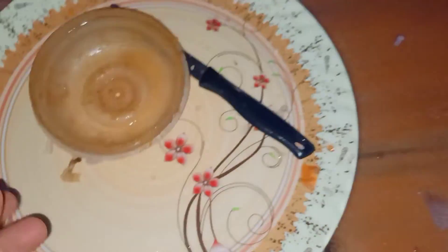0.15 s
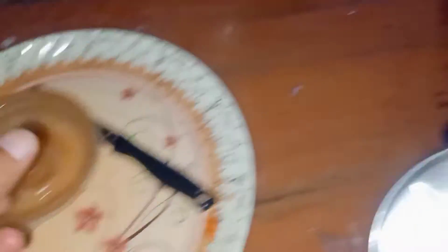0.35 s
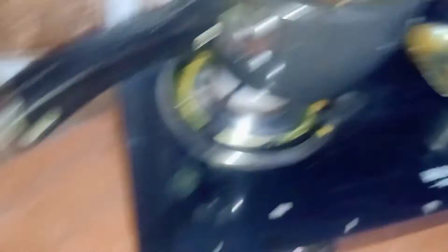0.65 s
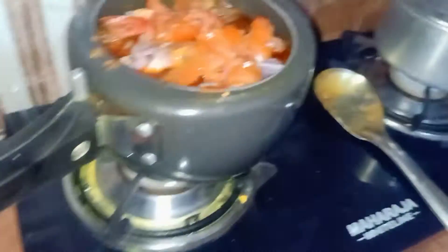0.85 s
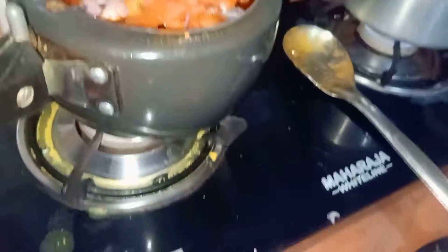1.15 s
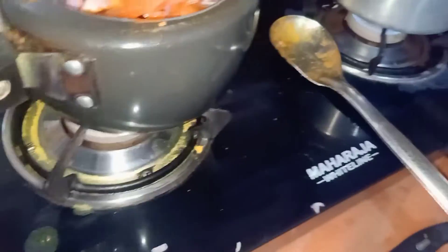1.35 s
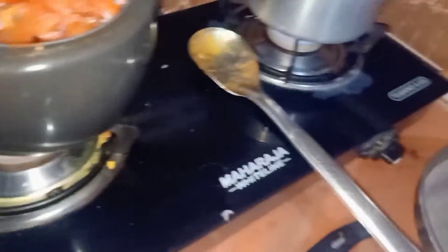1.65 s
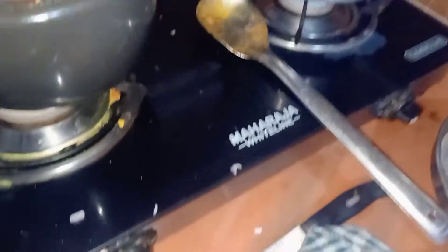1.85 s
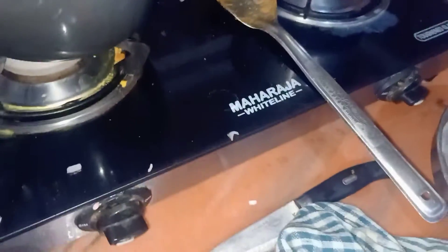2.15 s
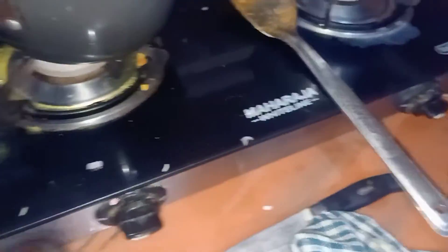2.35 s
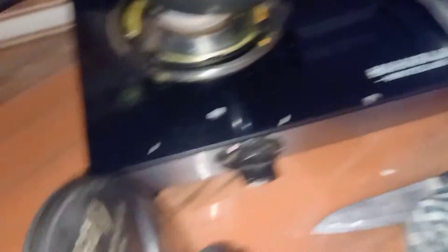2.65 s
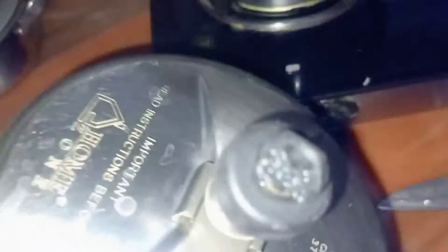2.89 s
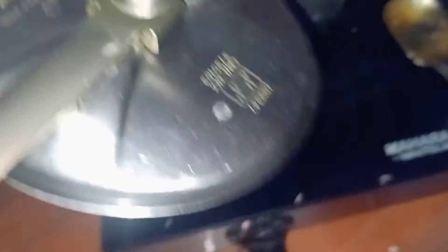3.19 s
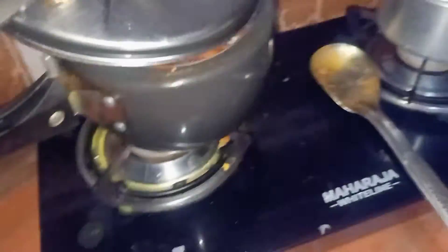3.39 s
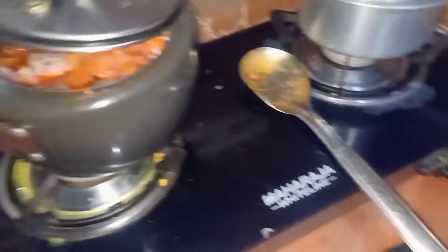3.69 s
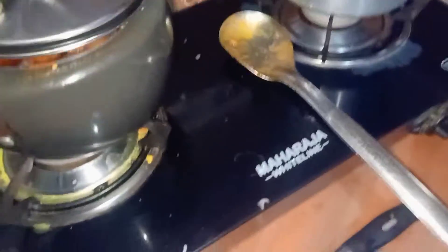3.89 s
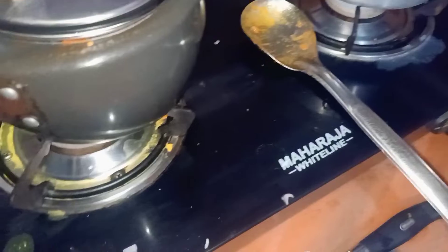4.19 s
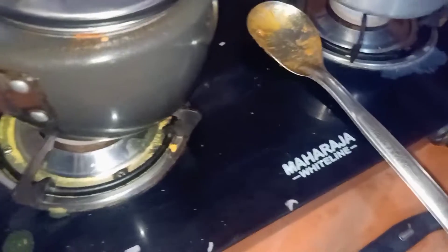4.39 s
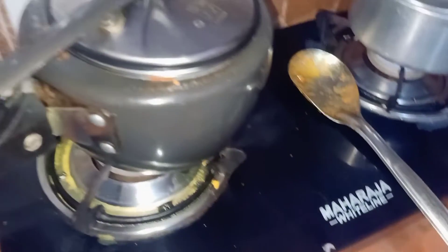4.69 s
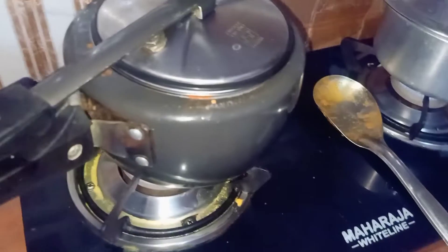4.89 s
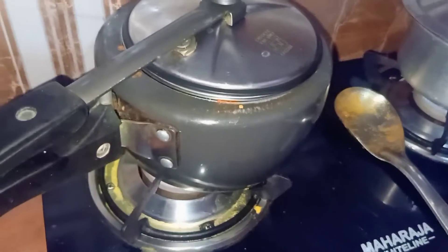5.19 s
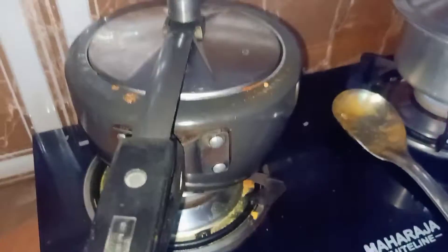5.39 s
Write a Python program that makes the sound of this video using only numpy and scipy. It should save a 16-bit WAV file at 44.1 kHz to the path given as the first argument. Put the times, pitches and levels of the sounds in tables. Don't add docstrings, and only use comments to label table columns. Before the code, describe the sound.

Short damped clanks of kitchen metal, heard near on an uneven stereo phone, brighter on the left and muffled on the right. First a thin tray rattle, later a lid's abrupt scrape and loose rattling, then one loud lid drop onto a pot and a smaller settling knock. Afterwards only light touches, cloth swishes, room rumble and a very faint far horn.

```python
import sys
import numpy as np
from scipy import signal
from scipy.fft import rfft, irfft
from scipy.io import wavfile
from scipy.ndimage import uniform_filter1d

SR = 44100
rng = np.random.default_rng(int(sys.argv[2]) if len(sys.argv) > 2 else 0)


def inscribe(sig):
    pcm = np.round(np.clip(np.atleast_2d(sig).T, -1, 1) * 32767)
    wavfile.write(sys.argv[1], SR, pcm.astype(np.int16))


def gain_from_db(level_db):
    decades = np.asarray(level_db, float) / 20
    return 10 ** decades


N = 244314
T = np.arange(N) / SR

# (frequency [Hz], level [dB], t60 [s])
LID_MODES = [(346, -3, 0.11), (500, -8, .1), (620, -8, .09), (775, -4, .08), (1012, -5, .05),
             (1710, -9, .1), (1752, -6, .14), (1970, -10, .07), (2090, -6, .1), (2230, -8, .08),
             (2321, 2, .22), (2376, -5, .16), (2472, -5, 0.14), (3112, -14, 0.07), (3450, -16, .1),
             (3594, -4.5, .17), (3870, -18, .06), (4260, -18, .07), (4540, -12, .08), (4782, -7.5, .1),
             (5168, -2, .12), (5232, -1.5, 0.17), (5438, -9, .08), (5556, 0, .17), (5716, -6, .12),
             (5902, -14, .08), (7240, -22, .04), (7462, -23, .04), (200, -6, .06), (400, -3, .13),
             (900, -8, .06)]
# (frequency [Hz], level [dB], t60 [s])
POT_MODES = [(341, 1.5, .13), (420.2, -2, 0.14), (520, -8, .13), (653, -5, .14), (718, 2.5, .22),
             (797, -4, 0.16), (885, -7, .12), (1124, -12, 0.17), (1213, -10.5, .16), (1300, -16, .12),
             (1450, -16, .1), (1664, -2, .09), (1750, 1, .13), (1870, -10, .1), (2000, -4.5, .13),
             (2100, -1, 0.15), (2155, -1, .3), (2226, -3, .16), (2330, -3, 0.09), (2380, -6, .11),
             (2488, -9, .09), (2978, -12, .07), (3240, -14, .07), (3600, -17, .1), (3700, -15, .3),
             (3791, -17, 0.098), (4176, -14, .11), (4570, -14, .08), (4914, -10, .1), (5220, -1, 0.18),
             (5300, -4, .2), (5538, -3, .11), (5630, -6, .08), (5748, -5, .08), (6018, -9, .09),
             (6244, -13, .09), (245, -5, .07), (570, -8, .1), (950, -7, .11), (2285, -3, .12)]
# (frequency [Hz], level [dB per Hz])
CONTACT_COLOUR = [(90, -55), (170, -22.5), (340, -26.5), (720, -14), (1500, -14), (1750, -6), (2310, 6.5),
                  (2900, -5), (4300, -20.5), (5400, -12), (6600, -22.5), (8500, -35), (12000, -38.5),
                  (15300, -35.5), (15900, -71.5)]
# (lower edge [Hz], upper edge [Hz])
BANDS_HZ = [(170, 1200), (1200, 3500), (3500, 8000), (8000, 19000)]
FREE_SPOT_DB = 6


def colour(x, points):
    hz, db = np.transpose(points)
    grid = np.maximum(np.fft.rfftfreq(4096, 1 / SR), 1)
    log_gain = np.interp(np.log(grid), np.log(hz), db) * np.log(10) / 20
    cepstrum = irfft(log_gain)
    cepstrum[1:2048] *= 2
    cepstrum[2049:] = 0
    impulse = irfft(np.exp(rfft(cepstrum)))
    return signal.oaconvolve(x, impulse[None], axes=-1)[:, :x.shape[1]]


def band(x, edges):
    return signal.sosfilt(signal.butter(2, edges, "band", fs=SR, output="sos"), x)


def band_of(hz):
    return np.searchsorted([edge for edge, _ in BANDS_HZ[1:]], hz)


def unit_rms(x):
    return x / np.sqrt(np.mean(x ** 2))


def walk(rate):
    hold = int(SR / rate)
    steps = np.repeat(rng.standard_normal(N // hold + 1), hold)
    return uniform_filter1d(steps, hold)[:N]


def pair(alike, size=N):
    mid, side = rng.standard_normal((2, size))
    alike = np.clip(alike, 0, 1)
    return np.sqrt((1 + alike) / 2) * mid + np.sqrt((1 - alike) / 2) * side * np.array([[1], [-1]])


def fade(x, ms):
    return signal.lfilter([1], [1, -np.exp(-1000 / (ms * SR))], x)


def ring(push, hz, t60, blur_hz):
    pole = np.exp(-np.log(1000) / (t60 * SR))
    jitter = np.cumsum(rng.standard_normal(len(push))) * np.sqrt(2 * np.pi * blur_hz / SR)
    phase = jitter + 2 * np.pi * hz * T[:len(push)]
    port_turn = np.array([[0], [min(hz / 1500, 1) * np.pi * rng.uniform(-1, 1)]])
    return signal.lfilter([1], [1, -pole], push) * np.sin(phase + port_turn)


def struck(hits, modes, tint, ring_db, crack_db, crack_ms, buzz_db, buzz_ms, top_db, top_slope, held_db=0,
           ping_db=-9, flare=1.5, spot_db=3, grip=1, rub=np.zeros(N), rub_db=(0, 0, 0, 0)):
    s, peak, low, high, spot_hz = np.transpose(hits)
    soft_db = 0.21 * np.minimum(peak + 38, 0)
    freedom = np.clip(0.5 + 0.02 * (low + 29.5), .2, 1)

    start = int(max(np.round(s[0], 1) - .1, 0) * SR)
    stop = int((np.round(s[-1], 1) + .4) * SR)
    size = stop - start
    at = np.round(s * SR).astype(int) - start
    rub = rub[start:stop]

    splash = top_db + top_slope * high + soft_db + 0.7 * (low + 15)
    bands_db = peak + np.array([low + 10.77, np.zeros(len(s)), high + 0.12, splash])
    out = np.zeros((2, N))

    for b, edges in enumerate(BANDS_HZ):
        blows = np.bincount(at, gain_from_db(bands_db[b]), size)
        ticks = np.bincount(at, gain_from_db(bands_db[b] + soft_db), size)
        crack = gain_from_db(crack_db) * fade(ticks, crack_ms)
        buzz = gain_from_db(buzz_db) * fade(blows, buzz_ms)
        burst = crack + buzz + abs(rub) * gain_from_db(rub_db[b])
        noise = pair(np.clip(400 / edges[0], .4, .9), size)
        paint = lambda x: band(band(colour(x, tint), edges), edges)
        contact = paint(burst * noise + gain_from_db(crack_db + 8) * ticks)
        out[:, start:stop] += contact / paint(noise[:, :SR // 4]).std()

    age = T[:SR // 20]
    spot_band = band_of(spot_hz)
    for i in range(len(s)):
        ping_level = gain_from_db(bands_db[spot_band[i], i] + ping_db - 60 * age / .045)
        ping = ping_level * np.sin(2 * np.pi * spot_hz[i] * age)
        begin = start + at[i]
        out[:, begin:begin + len(age)] += ping * np.minimum(age * spot_hz[i] / 2, 1)

    hz, db, t60 = np.transpose(modes)
    db = db + held_db
    mode_band = band_of(hz)
    late = (rng.random((len(s), len(hz))) * (.0015 + 1.5 / hz) * SR).astype(int)
    nearness = np.exp(-(np.log2(hz / spot_hz[:, None]) / .03) ** 2)
    chance = 2.2 * rng.standard_normal((len(s), len(hz))) + (spot_db - db) * nearness - 2
    touching = 1 + flare * np.minimum(fade(np.bincount(at, np.ones(len(s)), size), 4.72), 1)
    for k in range(len(hz)):
        strength = freedom * gain_from_db(ring_db + bands_db[mode_band[k]] + chance[:, k])
        push = np.bincount(at + late[:, k], strength, size) + rub
        tone = ring(push, hz[k], t60[k] / grip, blur_hz=5 + hz[k] / 600 + 3000 / hz[k])
        out[:, start:stop] += gain_from_db(db[k]) * band(touching * tone, (hz[k] / 2.18, hz[k] * 1.89))
    return out


def pot_drop():
    # (time [s], peak [dB], low band over peak [dB], high band over peak [dB], favoured mode [Hz])
    pot_hits = [
        (3.7262, -15, -19, -2, 2290),
        (3.7289, -13.5, -16.5, -1, 5590),
        (3.7395, -19, -22, -0.5, 1650),
        (3.7418, -14.5, -24, -12, 2350),
        (3.7488, -24.5, -11, 6, 5780),
        (3.7565, -28, -16.5, -4, 2980),
        (3.7624, -34, 0, -12, 718),
    ]
    pot_open_db = [1, -5.5, -5.5, -3.5, 0, 0.5, -1.5, 8.5, 6, -0.5, -3, -4.5, 6.5, 2.5, -7.5, 4.5, -1, 6.5,
                   1, 1.5, 3, 0.5, 0, -1, -4, -1, 3.5, 0.5, -5, -6.5, -5, -4, -1, 1, 4.5, 6.5, 1, -9.5, 6,
                   -6.5]
    return struck(pot_hits, POT_MODES, CONTACT_COLOUR, flare=3.25, ring_db=-20, crack_db=-6.5, crack_ms=4.1,
                  buzz_db=-19, buzz_ms=14, top_db=-13, top_slope=0.8, held_db=pot_open_db, grip=1.63)


def lid_settle():
    # (time [s], peak [dB], low band over peak [dB], high band over peak [dB], favoured mode [Hz])
    settle_hits = [
        (3.8975, -18, -21.5, -11, 1750),
        (3.9045, -34.5, -7, -3, 5570),
        (3.9115, -28, -21.5, -3, 1750),
        (3.918, -41.5, 0, -14, 530),
        (3.9345, -41.5, -14, -2, 2320),
        (3.945, -40.5, -7, -4, 418),
        (3.972, -47, -3, -6, 400),
    ]
    pot_lidded_db = [-1.5, 3, 3, -12, -10, -8, -5, 4, -16, -22, 4, -7, -1.5, 5, 3, -10, -5, -8, -3, -5, 1.5,
                     -8, 6.5, 8, 7, 1, 0, -5, 7, -13.5, -3, 0, -2, -6.5, -2, 0.5, -3, -1.5, -5, 1.5]
    return struck(settle_hits, POT_MODES, CONTACT_COLOUR, flare=2.7, ring_db=-13, crack_db=-7, crack_ms=3.3,
                  buzz_db=-17, buzz_ms=11, top_db=-17.5, top_slope=0.68, held_db=pot_lidded_db, grip=1.43)


def drag():
    # (time [s], level [dB])
    drag_drive = [
        (2.3, -61.5),
        (2.43, -38),
        (2.476, -25),
        (2.504, -33.5),
        (2.592, -66),
        (2.64, -39),
    ]
    s, db = np.transpose(drag_drive)
    sizes = gain_from_db(2.5 * rng.exponential(size=N)) * rng.choice([-1, 1], N)
    slips = (rng.random(N) < 1500 / SR) * sizes
    surge_db = 3 * walk(120)
    return slips * gain_from_db(np.interp(T, s, db, left=-120, right=-120) - 23 + surge_db)


def lid_slips():
    # (time [s], peak [dB], low band over peak [dB], high band over peak [dB], favoured mode [Hz])
    rim_slips = [(2.3585, -28, -26, -2.5, 4782), (2.3953, -36, -17.5, -10, 2380),
                 (2.4207, -28, -16, -18.5, 1970), (2.4428, -19.5, -14.5, -9, 2472),
                 (2.4478, -28, -14, 2, 5570), (2.4535, -27, -19, 2, 3600), (2.4638, -21, -29, -1, 2310),
                 (2.4668, -22, -20.5, 1.7, 5120), (2.4775, -13, -22.5, -3, 2267),
                 (2.4825, -21.5, -22, -3.5, 5200), (2.4925, -17, -27, 4, 5660),
                 (2.4975, -20, -6.5, -6, 2230), (2.5028, -16.5, -24.5, 1, 5430),
                 (2.5172, -15, -17.5, 0, 5160), (2.531, -23.5, -23, -4.5, 2472),
                 (2.5809, -34.5, -31, 1.5, 5556)]
    lid_on_stone_db = [-17, -8.5, -3.5, 1, 2.5, 0, -2, 7.5, -1.5, -1, 4, -3, 0, 2.5, -3.5, -1.5, -0.5, 8,
                       -9, -12, -4, -4.5, -3.5, -2, -1, -7, 5.5, 6.5, -14, -12.5, 0.5]
    return struck(rim_slips, LID_MODES, CONTACT_COLOUR, flare=2.4, ping_db=-6.5, ring_db=-18, spot_db=6.5,
                  crack_db=-16.5, crack_ms=3.1, buzz_db=-29, buzz_ms=11, top_db=-12, top_slope=0.33,
                  held_db=lid_on_stone_db, grip=1.4, rub=drag(), rub_db=(0.5, -9.5, -8.5, -22.5))


def lid_rattle():
    # (time [s], peak [dB], low band over peak [dB], high band over peak [dB], favoured mode [Hz])
    lid_hits = [(2.1655, -45, -24, -13.5, 2330), (2.176, -47, -23.5, -8.5, 2330),
                (2.1915, -39.5, -16.5, -0.5, 5232), (2.266, -42, -19.5, -16.5, 2600),
                (2.2785, -26, -39, -16.5, 2472), (2.2835, -36, -33, -0.5, 4782),
                (2.2845, -40.5, -36, -3, 5716), (2.333, -39, -30, -9.5, 2472),
                (2.608, -34, -13.5, -4.5, 2800), (2.6312, -30, -20, -7.5, 2460),
                (2.6508, -17, -26.5, -9.5, 1764), (2.6528, -17.5, -35, -4.5, 5220),
                (2.6605, -36.5, -13.5, 5.5, 5320), (2.6644, -31.5, 0, 8.5, 703),
                (2.675, -35, -9, 1.5, 4780), (2.688, -34, -4, -9.5, 400), (2.705, -48, -2, -13, 383),
                (2.722, -49, 3, -15, 620), (2.9439, -39, -27, -7.5, 5270), (2.9505, -44, -16, -20, 2321),
                (2.992, -31.5, -18, -20.5, 2230), (3.0001, -38.5, -21, -7, 1970),
                (3.052, -33.5, -24.5, 4.5, 2090), (3.0542, -31.5, -20.5, -2, 6940),
                (3.0742, -45, -9, 12.5, 4940), (3.0786, -29, -30.5, -3, 3112), (3.0858, -46, -24, -3, 2321),
                (3.0905, -47, -24, 9, 2472), (3.2051, -44, -31, -2, 5700), (3.2236, -43.5, -32, -21, 2290),
                (3.2543, -35.5, -41, -1.5, 2290), (3.2765, -38, -35.5, -7, 4670),
                (3.2984, -38.5, -28.5, -4.5, 5640), (3.3623, -43, -20.5, -3, 5480),
                (3.4595, -39.5, -12.5, -7, 5490), (3.5857, -47, -14, -0.5, 2600)]
    lid_in_hand_db = [-1, 3, -0.5, -4, 2, -1.5, 4.5, -2.5, 5, 1.5, -9.5, -1, 4.5, 2.5, -3.5, -7, -2.5, -4.5,
                      3, 5, -2, -5.5, -6.5, -1, 0, -3, 4, -1, 0, -1, -5.5]
    return struck(lid_hits, LID_MODES, CONTACT_COLOUR, flare=2.46, ping_db=-3.5, ring_db=-14, crack_db=-5.5,
                  crack_ms=2.9, buzz_db=-27, buzz_ms=34, top_db=-12, top_slope=1.0,
                  held_db=lid_in_hand_db, spot_db=FREE_SPOT_DB, grip=1.6)


def tray_rattle():
    # (time [s], peak [dB], low band over peak [dB], high band over peak [dB], favoured mode [Hz])
    tray_hits = [(0.0004, -34, -5.5, -15, 1616), (0.0332, -22, -34, -9.5, 1654),
                 (0.0538, -12.5, -30, -6, 1917), (0.0646, -42, 1, -28, 1570),
                 (0.0998, -25.5, -10.5, -19, 1053), (0.113, -41, -6, -13, 334),
                 (0.1276, -23, -27, -8.5, 1619), (0.1494, -22.5, -35, -12, 1917),
                 (0.1659, -27.5, -21, -15, 1500), (0.3451, -49.5, -4, -17, 1616),
                 (0.427, -38, -11.5, -25, 1475), (0.439, -38, -26, -23, 1920),
                 (0.4839, -46.5, -7.5, -18, 1920)]
    # (frequency [Hz], level [dB], t60 [s])
    tray_modes = [(332.6, -4.5, 0.11), (599, -11, 0.13), (1053, -4, 0.096), (1320, -15, 0.028),
                  (1504, -3, 0.027), (1619, -3, 0.11), (1917, 1, 0.037), (2724, -5, 0.023),
                  (2869, -3, 0.014), (4310, -6, 0.019), (4610, -4.5, 0.014), (5090, 10.5, 0.012),
                  (5550, -3, 0.022)]
    # (frequency [Hz], level [dB per Hz])
    tray_colour = [(88, -48), (150, -32), (314, 0), (618, -8), (751, -35), (1040, 4.5), (1600, -5),
                   (3760, -12), (5330, -6), (6730, -26), (15500, -79)]
    return struck(tray_hits, tray_modes, tray_colour, ring_db=-10, crack_db=-4.5, crack_ms=1.9, buzz_db=-32,
                  buzz_ms=54, top_db=-3.5, top_slope=0.64, ping_db=-6.5, flare=1.85, spot_db=FREE_SPOT_DB)


def pot_nudges():
    # (time [s], peak [dB], low band over peak [dB], high band over peak [dB], favoured mode [Hz])
    nudge_hits = [
        (4.124, -50.5, -22, -11, 2270),
        (4.2208, -53, -18, -9, 2290),
        (4.229, -56, -21, 1, 5440),
        (4.2433, -49.5, -5, -5.5, 2155),
        (4.2777, -44.5, -24, -10, 2000),
        (4.2885, -48.5, -0.5, -10, 885),
        (4.2956, -40.5, -13, -1.5, 1960),
        (4.313, -56, -6, -9, 1124),
        (4.6877, -50.5, -10.5, -5.5, 4920),
    ]
    return struck(nudge_hits, POT_MODES, CONTACT_COLOUR, flare=0.99, ring_db=-11.5, crack_db=-4.5, crack_ms=2.6,
                  buzz_db=-17.5, buzz_ms=16, top_db=-42, top_slope=.4, spot_db=FREE_SPOT_DB, grip=2.4)


def room(x):
    # (frequency [Hz], t60 [s])
    room_t60 = [(200, 0.45), (1000, 0.31), (3000, 0.33), (8000, 0.36), (16000, 0.067)]
    hz, t60 = np.transpose(room_t60)
    t = T[:SR // 2]
    build_up = 1 - np.exp(-t / 0.00093)
    tail = 0
    for mid in 90 * 2. ** np.arange(8):
        decay = gain_from_db(-60 * t / np.interp(np.log(mid), np.log(hz), t60))
        noise = band(pair(300 / mid, len(t)), (mid / 2 ** .5, mid * 2 ** .5))
        tail = tail + decay * build_up * noise
    return signal.oaconvolve(x.mean(0)[None], tail, axes=-1)[:, :N]


def glints():
    # (time [s], level [dB], frequency [Hz], t60 [s])
    bangle_glints = [
        (.662, -59, 5808, .35),
        (.66, -76, 4780, .3),
        (.655, -72, 14000, .3),
        (.65, -72, 9700, .2),
        (.66, -78, 11700, .2),
        (.67, -73, 10500, .3),
        (1.265, -65, 11950, .4),
        (1.44, -76, 5500, .08),
        (1.85, -80, 10500, .3),
        (1.85, -80, 14000, .2),
    ]
    out = 0
    for s, db, hz, t60 in bangle_glints:
        touches = np.bincount([int(s * SR), int((s + .012) * SR)], [gain_from_db(db - 6), gain_from_db(db - 3)], N)
        out = out + band(ring(touches, hz, t60, blur_hz=4), (hz / 1.05, hz * 1.05))
    return out


def thumps():
    # (time [s], level [dB], frequency [Hz])
    finger_thumps = [
        (.04, -64, 35),
        (3.453, -66, 150),
        (2.481, -57.5, 40),
        (2.68, -74, 39),
        (3.75, -61.5, 60.4),
        (4.293, -47.5, 174),
        (5.33, -62, 35.1),
    ]
    bumps = 0
    for s, db, hz in finger_thumps:
        envelope = np.exp(-((T - s) * hz / 0.84) ** 2)
        bumps = bumps + gain_from_db(db) * envelope * np.sin(2 * np.pi * hz * (T - s))
    return bumps * gain_from_db(np.array([[-9], [6]]))


def facing_db():
    # (time [s], level [dB])
    facing = [
        (0, 3.5),
        (.3, 1.5),
        (.85, -0.5),
        (2.3, 1.5),
        (2.6, 1),
        (2.92, -5),
        (3.2, -1.5),
        (3.9, 0.5),
        (4.95, -4),
        (5.54, -2),
    ]
    return np.interp(T, *np.transpose(facing))


def swish(s, hold_s):
    attack = np.clip((T - s) / 0.014, 0, 1)
    return attack * gain_from_db(-105 * np.clip(T - s - hold_s, 0, 2))


def rustle():
    # (time [s], hold [s], level [dB], brightness [dB per band])
    swishes = [(0.0, 0.026, -40.5, 1), (0.437, 0.071, -67, -10.5), (1.056, 0.032, -64, 6.5),
               (1.531, 0.061, -50.5, 3), (1.822, 0.099, -61.5, 3.5), (2.3, 0.22, -53.5, 2),
               (2.367, 0.069, -50.5, -7.5), (2.635, 0.016, -35, 3.5), (3.06, 0.082, -68, 11),
               (3.885, 0.014, -40, -3), (4.13, 0.02, -76, 8.5), (4.248, 0.035, -64.5, -13.5),
               (4.493, 0.065, -67.5, -14), (4.732, 0.047, -64.5, -10), (5.422, .2, -57.5, -0.5)]
    # (frequency [Hz], level [dB per Hz])
    air_colour = [(120, -31.5), (200, -20), (340, -22), (394, -16), (432, -12), (722, -13.5), (1320, -16.5),
                  (2610, -8), (3430, -18.5), (5330, -10.5), (7830, -30.5), (11700, -35.5), (15300, -32),
                  (15800, -52)]
    cloth_db = (-4.5, -5, -13.5, -24.5)
    air_db = (-63.5, -71, -76.5, -92)
    # (start [s], end [s])
    burner_fades_s = (3.2, 4.0)
    s, hold_s, db, bright_db = np.transpose(swishes)
    shapes = np.array([swish(*each) ** 2 for each in zip(s, hold_s)])
    burner = gain_from_db(-85) * np.interp(T, burner_fades_s, (1, .3))
    shared = walk(27)
    out = 0
    for b, (edges, alike) in enumerate(zip(BANDS_HZ, (0.086, 0.18, 0.03, 0.02))):
        flicker_db = 1.5 * shared + 1.2 * walk(55)
        still = gain_from_db(air_db[b] + 0.94 * facing_db())
        if b == 3:
            still = still + burner
        cloth_power = gain_from_db(2 * (db + cloth_db[b] + (b - 1) * bright_db)) @ shapes
        hiss = unit_rms(band(colour(pair(alike), air_colour), edges))
        out = out + np.sqrt(still ** 2 + cloth_power) * gain_from_db(flicker_db) * hiss
    return out


def rumble():
    # (frequency [Hz], level [dB per Hz])
    rumble_colour = [(15, -56.5), (25, -43), (47, -26.5), (70, -10), (89, -6), (139, 2), (327, -4.5),
                     (375, -10.5), (500, -15), (650, -49.5), (1100, -120)]
    lumps = unit_rms(colour(pair(.82), rumble_colour)) * gain_from_db(2.5 * walk(14))
    hum_hz = 103 * (1 + .02 * walk(8.6))
    hum = np.sin(2 * np.pi * np.cumsum(hum_hz) / SR) * gain_from_db(-6 + 5 * walk(6))
    return gain_from_db(-59.5 + facing_db()) * (lumps + hum)


def horn():
    # (time [s], fundamental [Hz], level [dB])
    horn_glide = [
        (5.01, 535, -100),
        (5.04, 538, -74),
        (5.3, 524, -73),
        (5.422, 512, -77),
        (5.45, 516, -100),
    ]
    # (multiple of the fundamental [1], level [dB])
    horn_orders = [(3, 2.5), (4, -8.5), (5, -7)]
    s, hz, db = np.transpose(horn_glide)
    phase = 2 * np.pi * np.cumsum(np.interp(T, s, hz)) / SR
    tones = sum(gain_from_db(d + 1.4 * walk(25)) * np.sin(k * phase) for k, d in horn_orders)
    return tones * gain_from_db(np.interp(T, s, db, left=-140, right=-140))


def scene():
    # (frequency [Hz], level [dB])
    hand_shade = [(300, -5), (1000, -1), (2400, -6), (4400, -3.5), (6000, -21), (9000, -5), (15000, -6.5)]
    near = tray_rattle() + lid_slips() + lid_rattle() + pot_drop() + lid_settle() + pot_nudges()
    near = near + gain_from_db(-34) * room(near)
    near[1:] = colour(near[1:], hand_shade)
    return near + glints() + thumps() + rustle() + rumble() + horn()


def band_limit(x):
    return signal.sosfilt(signal.butter(12, 16470, fs=SR, output="sos"), x)


def record(dry):
    # (frequency [Hz], level [dB])
    port_balance = [(60, 5), (110, -1.5), (200, 2.5), (380, -2), (700, 3), (1290, 2), (2380, 3.5),
                    (4400, 18.5), (8120, 12.5), (15000, 4.5)]
    hz, db = np.transpose(port_balance)
    left_db = 10 * np.log10(4 / (1 + gain_from_db(-2 * db))) - 3
    left = colour(dry[:1], np.c_[hz, left_db])
    right = colour(np.roll(dry[1:], 17, axis=1), np.c_[hz, left_db - db])
    return band_limit(np.vstack([left, right]))


dry = scene()
out = record(dry)
inscribe(out)
```